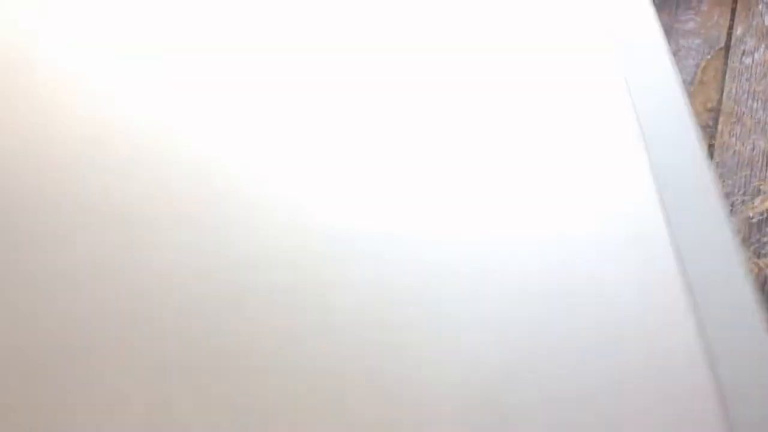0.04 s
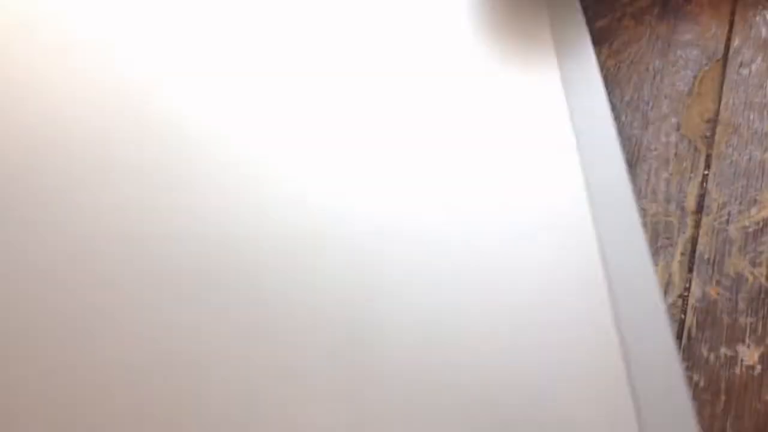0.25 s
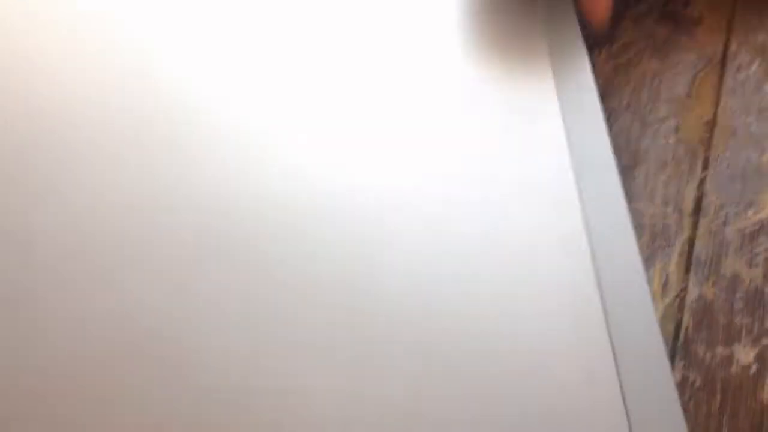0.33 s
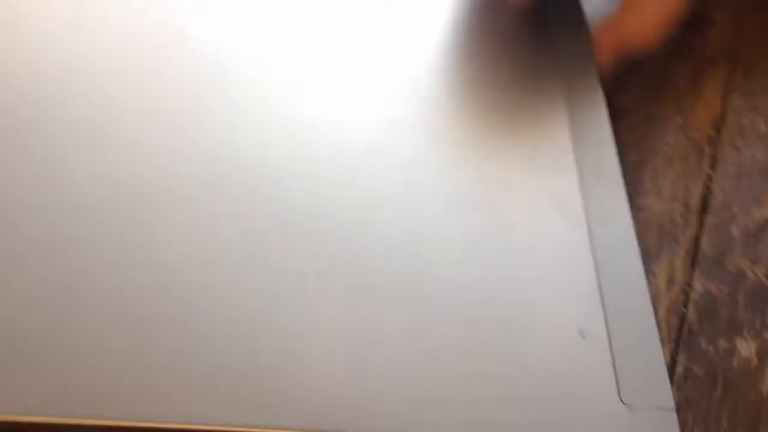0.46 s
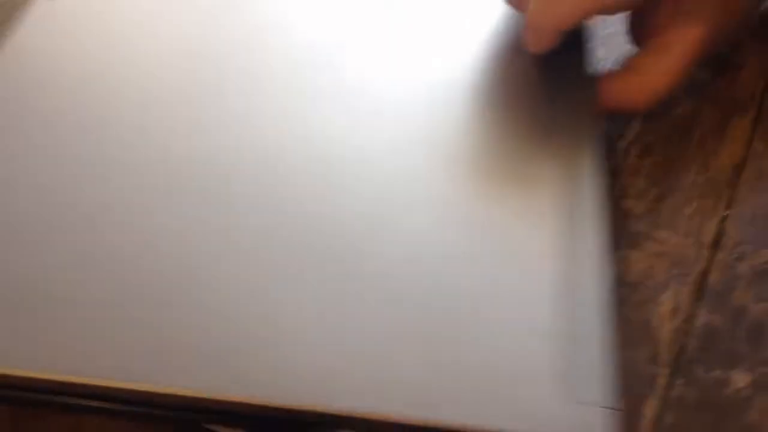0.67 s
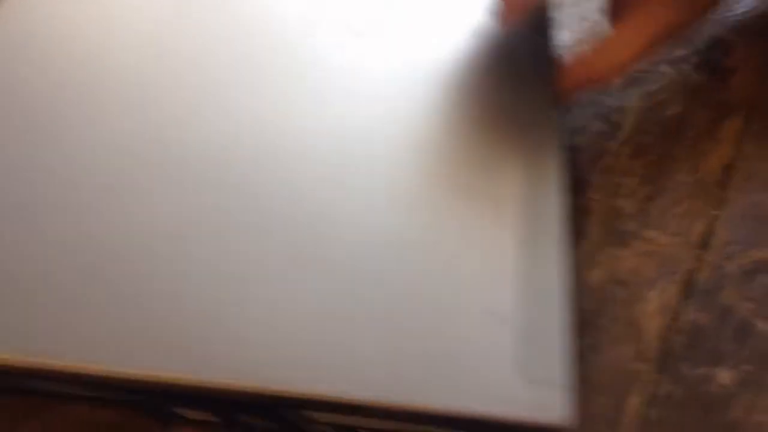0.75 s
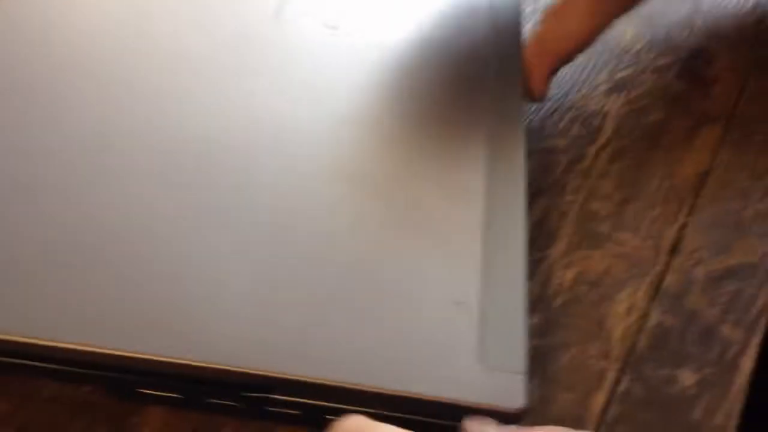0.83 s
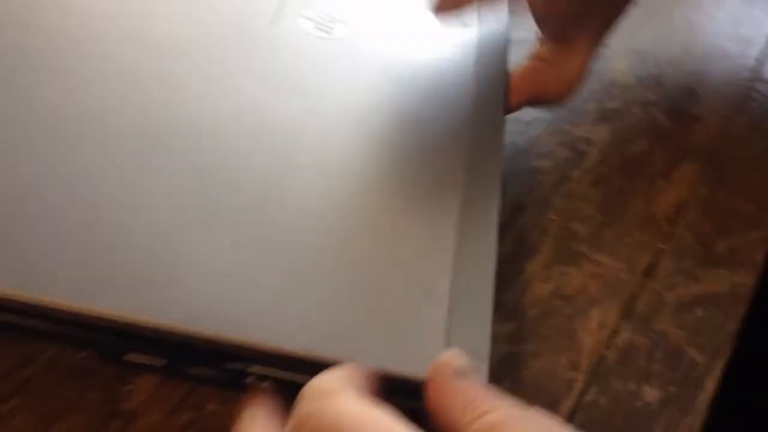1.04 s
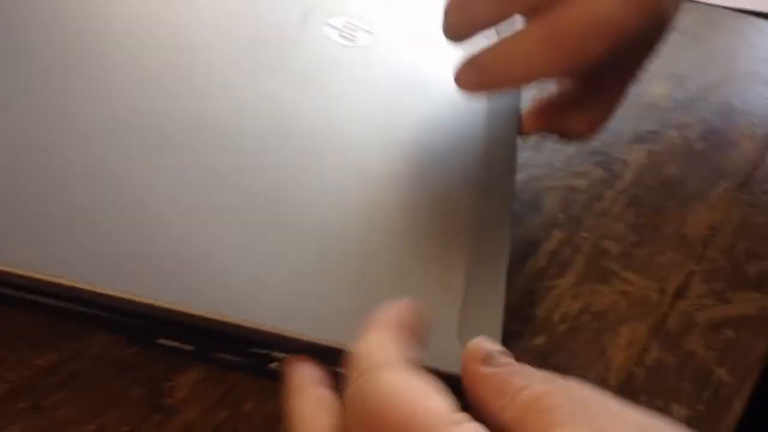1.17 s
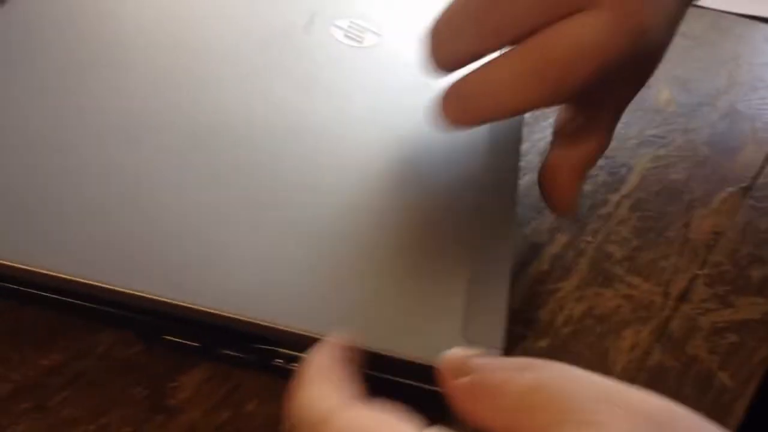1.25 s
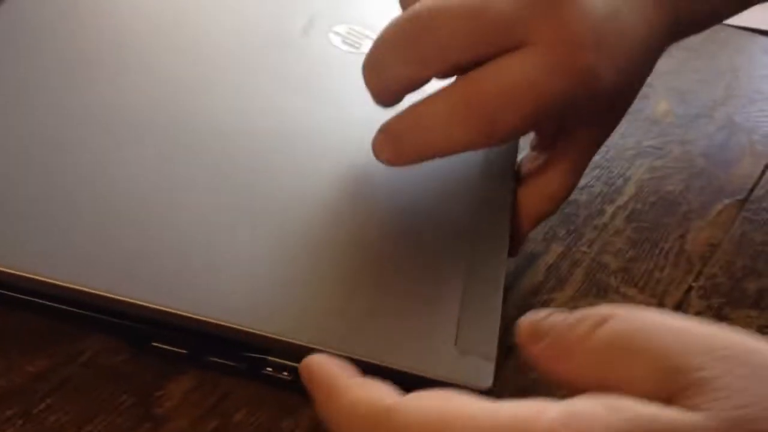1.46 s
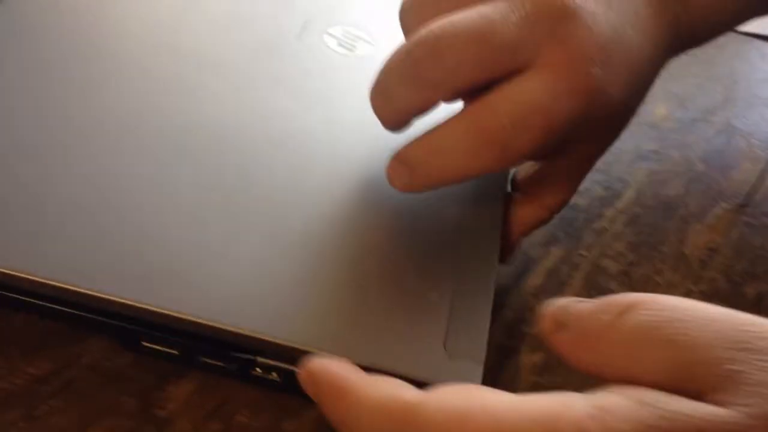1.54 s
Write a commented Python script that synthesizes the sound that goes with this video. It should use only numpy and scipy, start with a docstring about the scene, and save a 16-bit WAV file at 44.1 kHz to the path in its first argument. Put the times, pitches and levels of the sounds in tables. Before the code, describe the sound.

Laptop set down on wood with a clattering thud, a sharp click and light bumps.

```python
"""A small quiet room, close to a wooden table. A closed laptop is set down: its feet land in a quick
cluster of thuds that ring the boards and clack the case. An edge snaps against the wood with a hard
click, the feet stick and slip as the laptop is pushed round, and fingers tap the case.
Behind it, a faint hiss and the room's rumble."""
import sys
import numpy as np
from scipy import signal
from scipy.fft import rfft, irfft, next_fast_len
from scipy.io import wavfile

SR = 44100
rng = np.random.default_rng(int(sys.argv[2]) if len(sys.argv) > 2 else 0)


def materialize(psi):
    """Save the field psi as 16-bit PCM at rate SR to the path in sys.argv[1].

    A 1-D psi becomes a single channel; in a 2-D psi each row is a channel.
    """
    bounded = np.clip(np.atleast_2d(psi).T, -1, 1)
    quanta = np.round(bounded * 32767).astype(np.int16)
    wavfile.write(sys.argv[1], SR, quanta)


N = 70560
T = np.arange(SR // 2) / SR  # time axis of one event, s

# table board modes: pitch_hz, level_db, t60_s
BOARD_MODES = [(61, -4.5, 0.16), (93.2, -8, 0.1), (119.5, 1, 0.11), (178, -4, .13), (223, -8.5, 0.11),
               (256.2, -5, 0.14), (371.7, -14.5, 0.15), (414.5, -13.5, .16), (485, -12, 0.13),
               (766.7, -17.5, 0.11), (1021.6, -19.5, 0.11)]


def landings():
    """Each blow thumps the boards and clacks the hollow case; loose parts rattle on briefly."""
    # blows: start_s, thump_db, clack_db, tilt_db_per_octave
    blows = [(.047, -43.5, -47.5, 0), (.146, -42, -75, 21), (.1905, -22.5, -39.5, 6), (.203, -46, -35, 2),
             (0.211, -37, -41, 7), (0.2161, -37, -25.5, 3.5), (0.2204, -13, -17.5, -2),
             (0.2226, -22, -12.5, .5), (.2315, -21, -25.5, 3), (0.2527, -22, -20, -1.5),
             (0.386, -31.5, -46, -11), (.444, -39.5, -72, 1), (.698, -30, -30, -1),
             (0.7934, -25, -21.5, -9.5), (0.8047, -21, -60, -10), (.855, -27.5, -37, -8.5),
             (0.883, -32.5, -37, -11.5), (.916, -35.5, -60, -9), (1.128, -39.5, -40.5, -0.5),
             (1.185, -43, -43.5, -9), (1.213, -53, -32, 1), (1.2155, -41, -30, -2.5),
             (1.222, -28, -46, -17), (1.287, -39.5, -66, -4)]
    # contact noise spectrum: freq_hz, density_db
    clack_spectrum = [(100, -16), (400, 0), (1000, -0.5), (1350, -7), (1750, -5), (2600, -11.5),
                      (3600, -8.5), (5000, -16.5), (9000, -23.5), (15000, -30)]
    # hollow case modes: pitch_hz, level_db, t60_s
    case_modes = [(464.8, -9.5, 0.054), (749.4, -4.5, 0.035), (1005, -9, .055), (1225, -15.5, 0.041),
                  (1673, -16.5, 0.068)]
    clack_decay = fade(t60_s=0.032) + amp(-14.5) * fade(t60_s=0.27)  # contact, then rattle
    out = np.zeros(N)
    for start_s, thump_db, clack_db, tilt_db in blows:
        thump = amp(thump_db) * board_ring(scatter_db=0)
        contact = noise(
            lambda hz: along(clack_spectrum, hz) + tilt_db * np.log2(np.maximum(hz, 600) / 1000), len(T))
        clack = amp(clack_db) * (ring(case_modes, scatter_db=3.5) + contact * clack_decay)
        add(out, start_s, (thump + clack) * rise(attack_s=0.0005))
    return out


def board_ring(scatter_db):
    """The boards' response to one jolt, with a 4.5 ms attack."""
    return ring(BOARD_MODES, scatter_db) * (1 - np.exp(-T / 0.0045))


def edge_click():
    """The hard edge catches, snaps and rebounds, ringing the shell and stirring a faint rattle."""
    # edge contacts: start_s, level_db
    contacts = [(.6958, -31), (.6970, -10.5), (.6992, -34.5), (.7088, -42)]
    # shell modes: pitch_hz, level_db, t60_s
    shell_modes = [(737, -15, 0.041), (1109, -16, 0.055), (1765, -19, 0.079), (1894, -9.5, 0.023),
                   (3020, -13, 0.034), (3644, 4.5, 0.013), (3827, -3, 0.014), (5080, -12, 0.028),
                   (10470, -4, 0.013), (11230, -19, 0.014), (13560, -17, 0.04)]
    # rattle spectrum: freq_hz, density_db
    rattle_spectrum = [(200, -25), (900, 12), (2000, 4.5), (4000, 3.5), (7000, -3), (11000, 0),
                       (15000, -11)]
    out = np.zeros(N)
    for start_s, level_db in contacts:
        snap = amp(-2) * fade(t60_s=0.016) * rng.standard_normal(len(T))
        rattle = amp(-20.5) * fade(t60_s=0.14) * noise(lambda hz: along(rattle_spectrum, hz), len(T))
        shell = ring(shell_modes, scatter_db=0.5)
        add(out, start_s, amp(level_db) * (shell + snap + rattle) * rise(attack_s=0.00092))
    return out


def sliding_feet():
    """The feet stick and slip at random: a rough rub, and jolts that ring the boards."""
    # slide envelope: time_s, level_db
    envelope = [(0, -57), (.05, -51.5), (.09, -66.5), (.18, -41.5), (.26, -18), (.33, -37), (.40, -35.5),
                (.45, -42.5), (.52, -50.5), (.68, -54), (.72, -41), (.765, -35), (.80, -28.5), (.88, -30.5),
                (.93, -40), (.97, -62), (1.07, -55.5), (1.14, -41.5), (1.2, -40.5), (1.29, -49.5),
                (1.36, -59), (1.6, -66)]
    # friction spectrum: freq_hz, density_db
    rub_spectrum = [(25, -8), (65, 2), (125, 4.5), (180, -13), (260, -2.5), (330, -10.5), (480, -8),
                    (800, -21.5), (1100, -18.5), (1500, -20), (3000, -30.5), (7000, -42), (15000, -52)]
    slips_per_s, spread_db, rub_db, judder_db = 350, 1, -2, -3.5
    slips = (rng.random(N) < slips_per_s / SR) * amp(spread_db * rng.standard_normal(N))
    boards = board_ring(scatter_db=1)
    judder = unit(signal.fftconvolve(slips * rng.choice([-1, 1], N), boards)[:N])
    slip_shape = rise(attack_s=0.0016) * fade(t60_s=0.038)
    grip = np.sqrt(np.abs(signal.fftconvolve(slips, slip_shape)[:N]))
    rub = unit(grip * noise(lambda hz: along(rub_spectrum, hz), N))
    return level(envelope) * (amp(rub_db) * rub + amp(judder_db) * judder)


def finger_ticks():
    """Fingers and grit tick and brush: noise bands from contacts too light to ring."""
    # touches: start_s, level_db, centre_hz, half_width_octaves, attack_s, t60_s
    touches = [(0.1916, -32.5, 6900, 0.42, 0.0005, .013), (0.801, -40, 3300, 0.91, .002, 0.024),
               (0.809, -47, 9000, 0.55, 0.0081, 0.088), (0.8291, -34.5, 3370, .3, 0.0011, 0.014),
               (0.877, -34, 2730, 0.23, 0.00097, 0.012), (0.899, -54, 6000, .6, .0005, .015),
               (0.98, -43.5, 12300, 0.18, 0.00043, 0.01), (0.9801, -46.5, 6500, 0.82, 0.00043, 0.012),
               (1.06, -45.5, 2980, 0.54, 0.0018, 0.035), (1.094, -49, 6460, 0.087, .012, 0.12),
               (1.097, -30, 1480, 0.26, 0.0098, 0.053), (1.1262, -35.5, 7550, 0.68, 0.00036, 0.01)]
    out = np.zeros(N)
    for start_s, level_db, centre_hz, octaves, attack_s, t60_s in touches:
        band = noise(lambda hz: -10 * np.log10(1 + (np.log2(hz / centre_hz) / octaves) ** 4), len(T))
        add(out, start_s, amp(level_db) * rise(attack_s) * fade(t60_s) * band)
    return out


def room_tail(x):
    """Reflections from 5 ms on, each frequency dying at its own rate."""
    # room decay: freq_hz, t60_s
    decay_times = [(100, 0.37), (1000, 0.4), (4000, 0.38), (14000, .25)]
    hz, time_s, spectra = signal.stft(rng.standard_normal(len(T)), SR, nperseg=256)
    decay = np.exp(-np.log(1000) * time_s / along(decay_times, hz)[:, None])
    tail = signal.istft(spectra * decay, SR, nperseg=256)[1]
    return signal.fftconvolve(x, tail[:len(T)] * (T > 0.005) / np.linalg.norm(tail))[:N]


def background():
    """A soft hiss swells and sinks over the room's steady rumble."""
    # hiss envelope: time_s, level_db
    hiss_envelope = [(0, -54.5), (.2, -54), (.42, -60), (.62, -64.5), (.75, -54.5), (.95, -67),
                     (1.03, -66.5), (1.11, -53), (1.16, -59.5), (1.25, -59), (1.33, -59), (1.41, -59),
                     (1.6, -63.5)]
    # hiss spectrum: freq_hz, density_db
    hiss_spectrum = [(150, -22), (400, -2), (1000, -1), (1700, -3), (2600, -4), (4500, -5.5), (9000, -10.5),
                     (15000, -13.5)]
    # rumble spectrum: freq_hz, density_db
    rumble_spectrum = [(25, -26), (60, -6), (122, 1.5), (180, -14), (255, -5), (330, -6), (440, -13),
                       (700, -14.5), (1500, -12.5), (3300, -41)]
    hiss = level(hiss_envelope) * noise(lambda hz: along(hiss_spectrum, hz), N)
    rumble = amp(-59.5) * noise(lambda hz: along(rumble_spectrum, hz), N)
    return hiss + rumble


def ring(modes, scatter_db):
    """Damped modes from rest, alternating in sign, with random level scatter per strike."""
    return sum(
        (-1) ** k * amp(db + scatter_db * rng.standard_normal())
        * fade(t60_s) * np.sin(2 * np.pi * hz * T)
        for k, (hz, db, t60_s) in enumerate(modes))


def noise(spectrum_db, size):
    """Noise of rms 1, shaped by spectrum_db(hz)."""
    hz = np.fft.rfftfreq(size, 1 / SR) + 1
    return unit(irfft(rfft(rng.standard_normal(size)) * amp(spectrum_db(hz)), size))


def rise(attack_s):
    """Smooth onset."""
    return 1 - np.exp(-(T / attack_s) ** 2)


def fade(t60_s):
    """Exponential decay."""
    return np.exp(-np.log(1000) * T / t60_s)


def level(points):
    """Gain per sample from (time_s, level_db) points."""
    return amp(np.interp(np.arange(N) / SR, *np.transpose(points)))


def along(points, hz):
    """Interpolate (freq_hz, value) points on a log axis."""
    freqs_hz, values = np.transpose(points)
    return np.interp(np.log(hz + 1), np.log(freqs_hz + 1), values)


def amp(db):
    """Decibels to gain."""
    return 10 ** (np.asarray(db) / 20)


def unit(x):
    """Scale to rms 1."""
    return x / np.sqrt(np.mean(x ** 2) + 1e-20)


def add(track, start_s, sound):
    """Mix a sound into the track."""
    part = track[max(round(start_s * SR), 0):][:len(sound)]
    part += sound[:len(part)]


def scene():
    """All contacts, room reflections and background, in mono."""
    thuds = landings()
    clicks = edge_click() + finger_ticks()
    reflections = room_tail(amp(-12.5) * thuds) + room_tail(amp(-25) * clicks)
    return (thuds + clicks + sliding_feet() + reflections + background())[None]


def record(dry):
    """The microphone cuts deep bass, rounds the highest peaks and limits the band."""
    low_cut_hz, top_hz, overload_level = 60, 15450, 0.7
    thin = signal.sosfilt(signal.butter(2, low_cut_hz, "high", fs=SR, output="sos"), dry)
    rounded = thin / (1 + (thin / overload_level) ** 4) ** (1 / 4)
    size = next_fast_len(N + len(T))
    hz = np.fft.rfftfreq(size, 1 / SR)
    return irfft(rfft(rounded, size) / (1 + (hz / top_hz) ** 120), size)[:, :N]


dry = scene()
out = record(dry)
materialize(out)
```